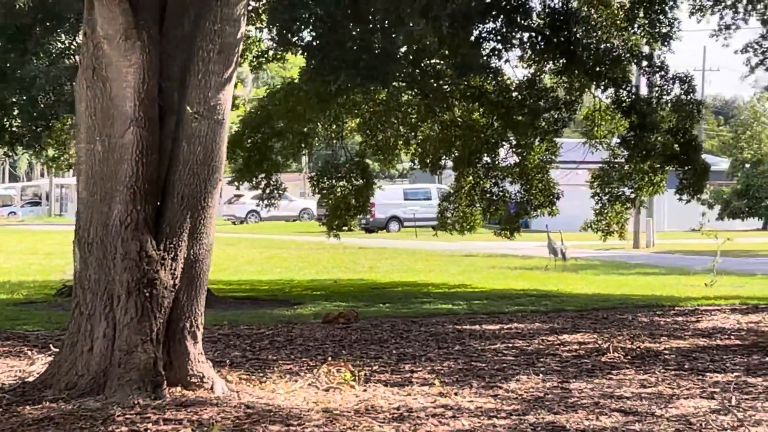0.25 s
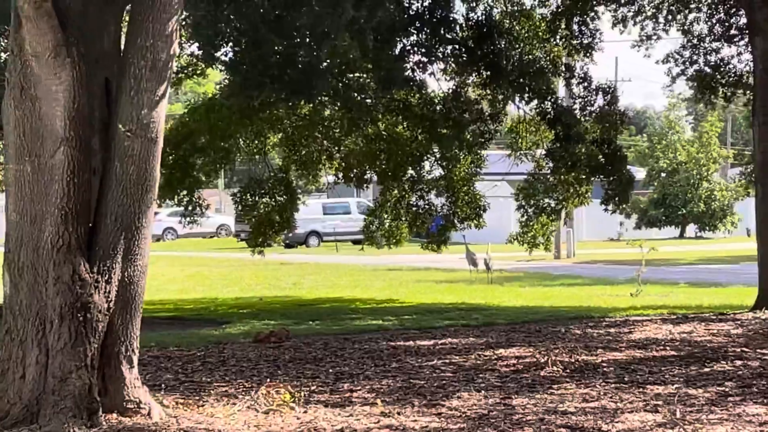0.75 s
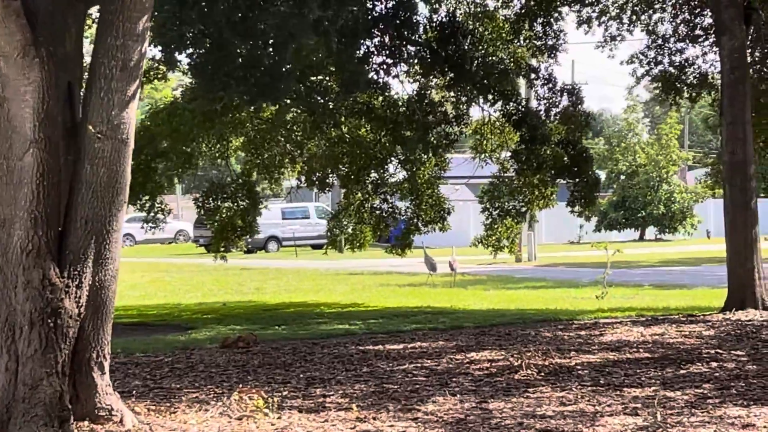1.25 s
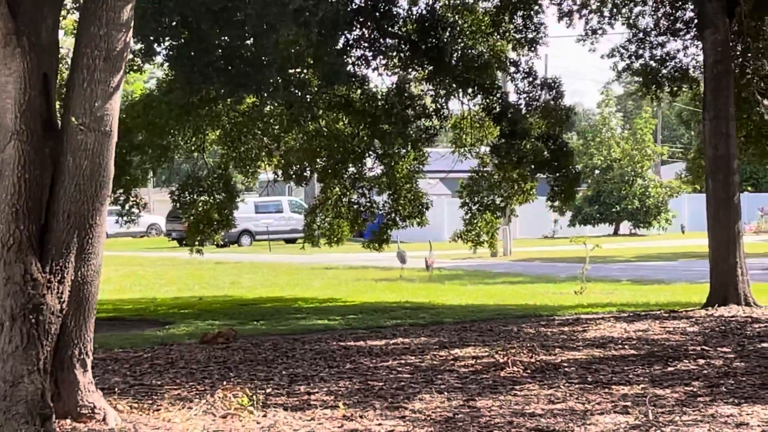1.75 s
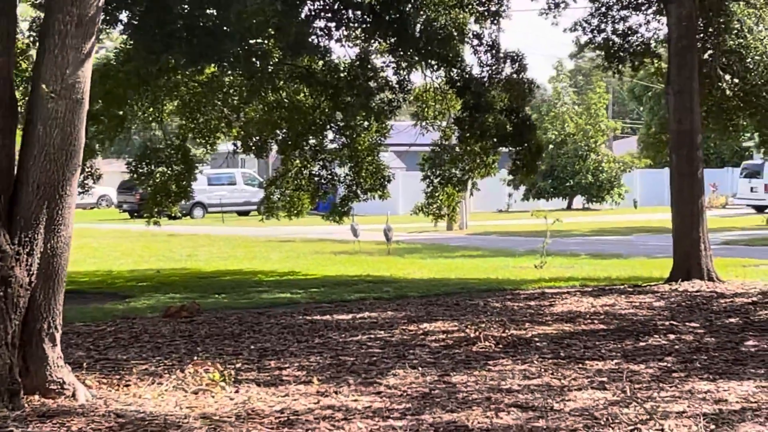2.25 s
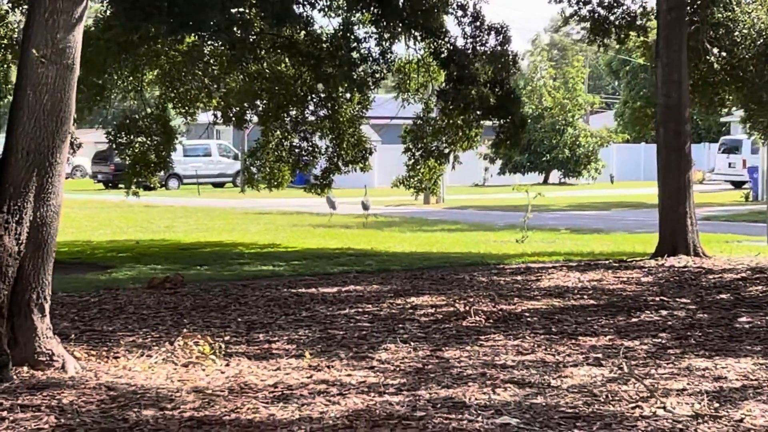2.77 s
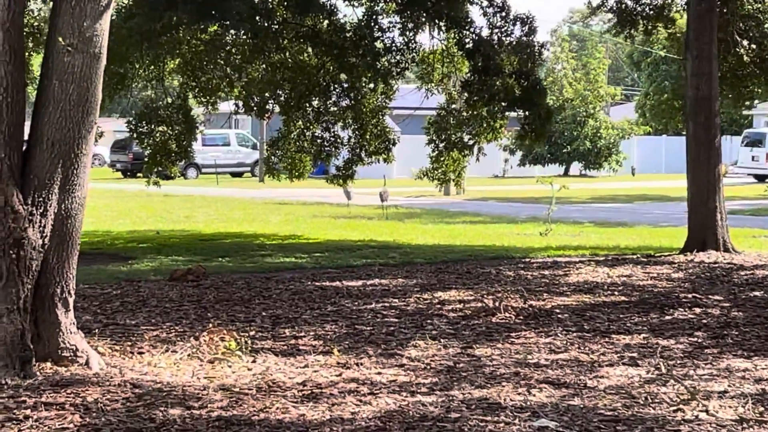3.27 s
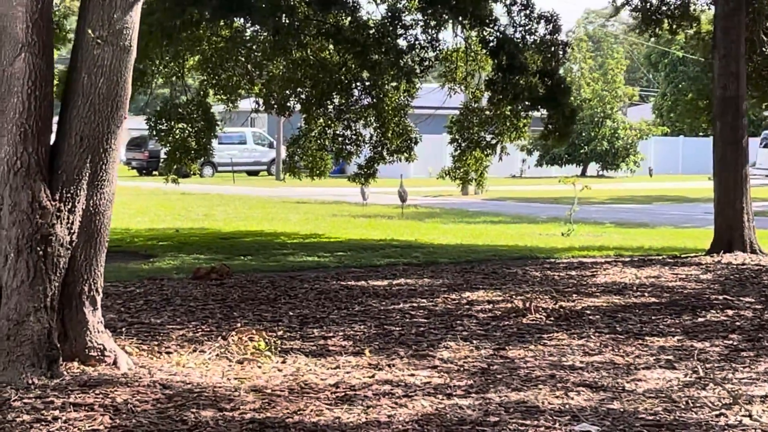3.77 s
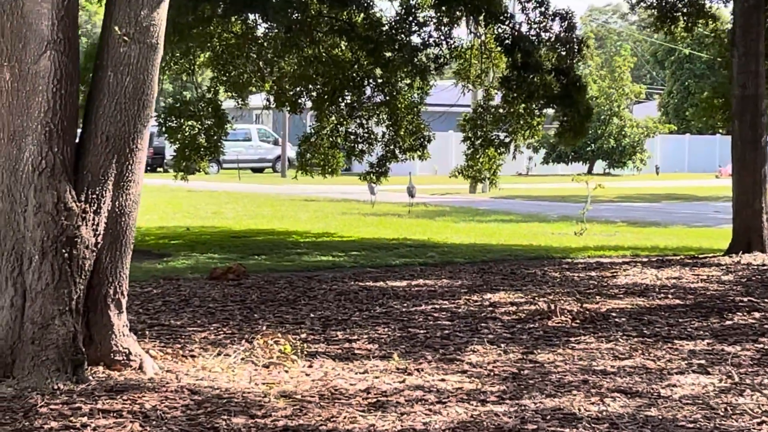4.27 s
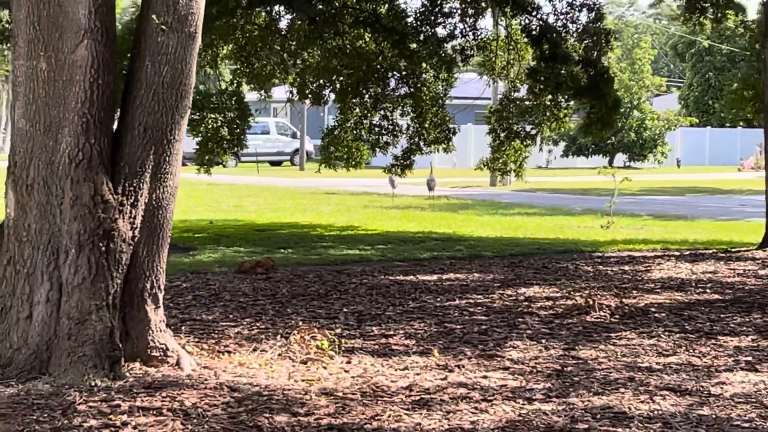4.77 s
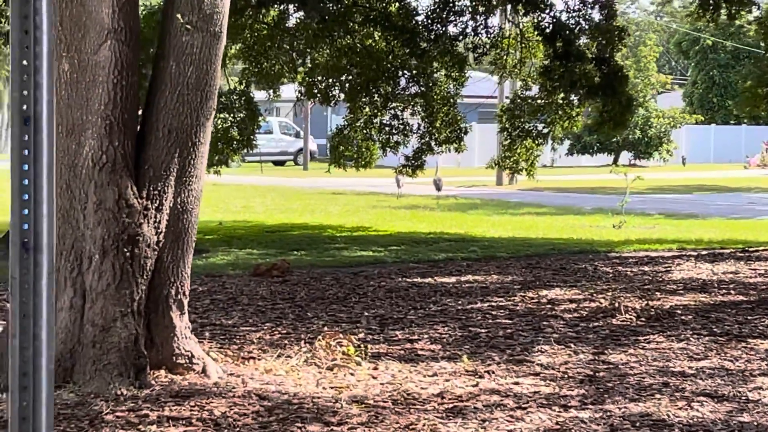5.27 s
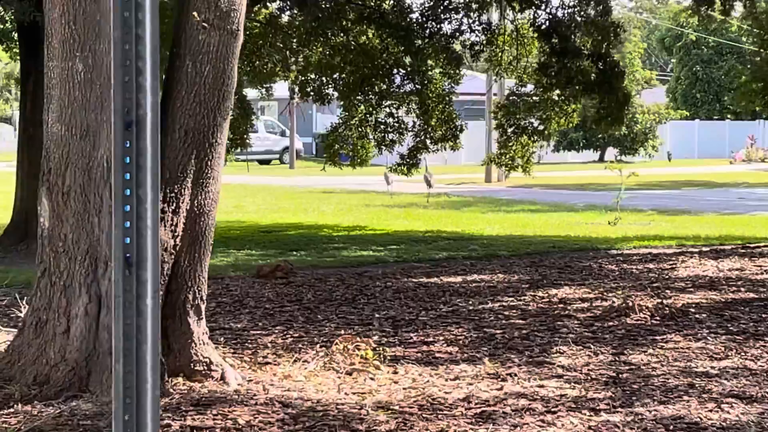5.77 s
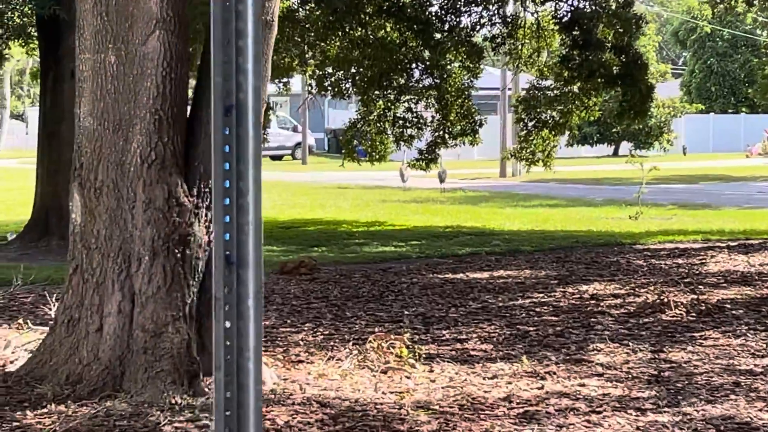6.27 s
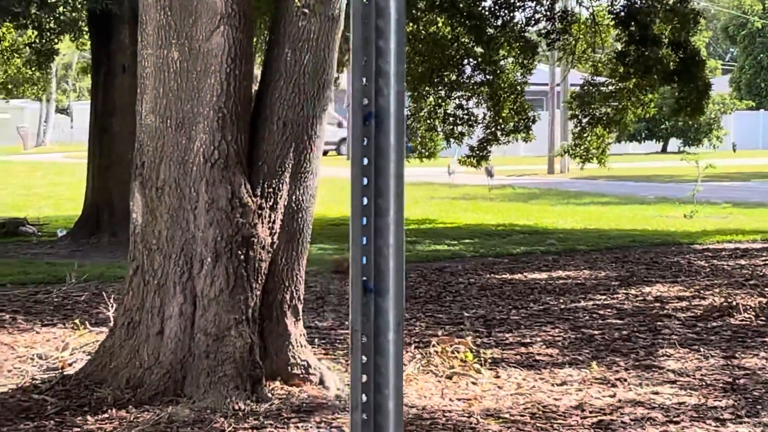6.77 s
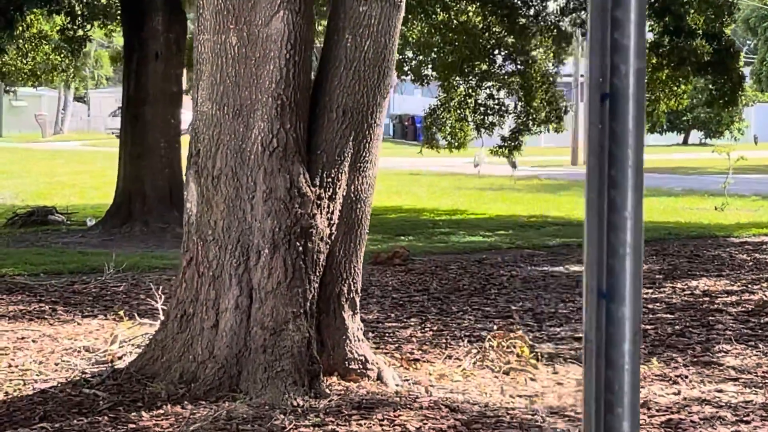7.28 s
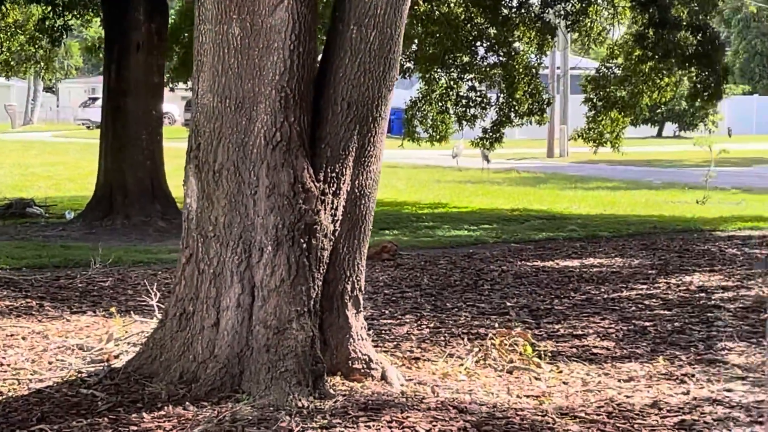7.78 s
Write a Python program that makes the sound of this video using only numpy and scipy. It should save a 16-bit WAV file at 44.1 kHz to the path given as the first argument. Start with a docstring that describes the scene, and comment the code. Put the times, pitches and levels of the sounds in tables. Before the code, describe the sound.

Two large cranes give three short rattling duets outdoors, over a steady low traffic rumble and a few faint crackling footsteps.

```python
"""Two sandhill cranes give three rattling duets on a lawn: one leads with hollow knocks, and its mate
overlaps with harsher beats and finishes alone. Membranes in each bird's voice box pulse and ring its
long, coiled windpipe. A soft note and a short, clear honk mark the start of each duet, and trees and
houses scatter the calls. Behind them traffic rumbles, an engine idles, leaves hiss and something
chirrs faintly; close by, soft steps crackle in the mulch."""
import sys
import numpy as np
from scipy import signal
from scipy.fft import rfft, irfft, next_fast_len
from scipy.io import wavfile

SR = 44100
rng = np.random.default_rng(int(sys.argv[2]) if len(sys.argv) > 2 else 0)


def generate_wav(signal):
    """Clip the signal to [-1, 1] and save it as 16-bit WAV at the path in sys.argv[1]."""
    frames = np.transpose(np.atleast_2d(signal))
    scaled = np.clip(frames, -1, 1) * 32767
    pcm = np.round(scaled).astype(np.int16)
    wavfile.write(sys.argv[1], SR, pcm)


N = 354034
BEAT_TIME = np.arange(SR // 10) / SR   # seconds within one short sound
FFT_SIZE = next_fast_len(N + SR // 10, real=True)
BIN_HZ = np.fft.rfftfreq(FFT_SIZE, 1 / SR)


def from_db(db):
    """Turn decibels into a gain."""
    return 10 ** (np.asarray(db) / 20)


def unit_power(x):
    """Scale a sound to an average power of one."""
    return x / np.sqrt(np.mean(x ** 2) + 1e-20)


def at_hz(points, hz):
    """Read between the rows of a table, on a log-frequency axis."""
    f, value = np.transpose(points)
    return np.interp(np.log(np.maximum(hz, 1)), np.log(f), value)


def add(track, s, sound):
    """Mix a sound in, starting at s seconds."""
    i = round(s * SR)
    track[i:i + len(sound)] += sound[:N - i]


def keep_band(x, hz, kind, order=2):
    """Keep the "low" or the "high" side of hz."""
    return signal.sosfilt(signal.butter(order, hz, kind, fs=SR, output="sos"), x)


def resonate(x, hz, width_hz):
    """Let a sound ring at one frequency; a narrower ring lasts longer."""
    r = np.exp(-np.pi * width_hz / SR)
    feedback = [1, -2 * r * np.cos(2 * np.pi * hz / SR), r * r]
    return signal.lfilter(np.array([1, 0, -1]) * (1 - r * r) / 2, feedback, x)


def cavity(x, modes):
    """A hollow space rings at several frequencies, added with alternating signs."""
    return sum((-1) ** k * from_db(db) * resonate(x, hz, width)
               for k, (hz, width, db) in enumerate(modes))


def drift(rate, size):
    """A random wander that heads for a new value `rate` times a second."""
    at = np.arange(size) * rate / SR + rng.random()
    count = int(at[-1]) + 2
    return np.interp(at, np.arange(count), rng.standard_normal(count))


# How alike sound from all around is in the two ears: f/Hz, likeness from 0 to 1
EAR_LIKENESS = [(40, 1), (130, 0.98), (220, 0.78), (400, 0.47), (750, 0.09), (1300, 0.22), (2200, 1),
                (6000, 1), (12000, 1)]

def stereo_noise(spectrum, size):
    """Noise with a given tone colour, partly alike in both ears."""
    mid, side = rfft(rng.standard_normal((2, FFT_SIZE)))
    alike = at_hz(EAR_LIKENESS, BIN_HZ)
    ears = np.sqrt(1 + alike) * mid + np.sqrt(1 - alike) * side * [[1], [-1]]
    return irfft(from_db(at_hz(spectrum, BIN_HZ)) * ears, FFT_SIZE)[:, :size]


# Tone colour of the traffic: f/Hz, relative level/dB
TRAFFIC_TONE = [(25, -9.5), (38, -5), (53, 5), (66, -2.5), (85, -2), (110, -2), (145, -4), (170, -10),
                (210, -13), (280, -17.5), (380, -19.5), (500, -20)]

def traffic(db=-44.5):
    """Far traffic blends into a steady, low rumble."""
    rumble = keep_band(stereo_noise(TRAFFIC_TONE, N), 430, "low", order=4)
    return from_db(db) * unit_power(rumble)


# Tone colour of the hiss from trees and far roads: f/Hz, relative level/dB
HISS_TONE = [(400, 1), (600, -3), (1000, -7), (1500, -13.5), (2200, -19.5), (3200, -22), (4200, -26.5),
             (4900, -25), (6500, -29), (8200, -32.5), (9800, -26), (10800, -33.5), (12500, -40)]
# Rise and fall of the leaves' hiss, in four groups of rows: t/s, relative level/dB
LEAF_SWELLS = [
    [(0.0, -71), (0.176, -78), (0.42, -71.5)],
    [(2.2, -76), (3.152, -75), (3.5, -77.5)],
    [(4.55, -76.5), (5.092, -77.5), (5.3, -74)],
    [(6.85, -76), (6.964, -75), (8.0, -76)],
]

def breeze(db=-55.5, rustle_db=1.4):
    """Trees and far roads hiss softly; the treble wavers as the leaves rustle."""
    air = from_db(db) * unit_power(keep_band(stereo_noise(HISS_TONE, N), 411, "high", order=4))
    leaves = air - signal.sosfiltfilt(signal.butter(1, 1800, fs=SR, output="sos"), air)
    s, hiss_db = np.vstack(LEAF_SWELLS).T
    lift_db = np.interp(np.arange(N) / SR, s, hiss_db - hiss_db.mean()) + rustle_db * drift(18, N)
    return air + leaves * (from_db(lift_db) - 1)


# The tones of the engine's hum: f/Hz, level/dB
ENGINE_TONES = [(137.5, -56.5), (206, -65), (297, -69)]

def engine(waver=0.0105, flutter=0.32):
    """An engine idles unevenly: its tones waver together in pitch, and each flutters in level."""
    clock = np.cumsum(1 + waver * drift(8, N)) / SR
    return sum(from_db(db) * unit_power(np.sin(2 * np.pi * hz * clock) * (1 + flutter * drift(16, N)))
               for hz, db in ENGINE_TONES)


# Faint, high chirrs far away: t/s, length/s, level/dB
FAR_CHIRRS = [(2.596, 0.3, -71.5), (4.923, 0.3, -81)]

def chirrs(hz=4750, width_hz=650):
    """A thin band of noise, perhaps an insect, swells and fades."""
    out = np.zeros(N)
    for s, length, db in FAR_CHIRRS:
        progress = np.linspace(0, 1, round(length * SR))
        band = resonate(resonate(rng.standard_normal(SR), hz, width_hz), hz, width_hz)[:len(progress)]
        add(out, s, from_db(db) * unit_power(band) * np.sin(np.pi * progress))
    return out


# Feet pressing the mulch: t/s, length/s, level/dB before filtering
FOOTSTEPS = [(1.273, 0.13, -52.5), (1.819, 0.22, -50.5), (1.949, 0.21, -54.5), (2.332, 0.046, -61),
             (4.456, 0.051, -60), (4.647, 0.12, -61.5), (4.748, 0.055, -55), (5.424, 0.089, -49)]

def footsteps(grains_per_s=7000, spread_db=2.5, leaf_hz=6000):
    """Dry leaves crush under each step in tiny clicks, or grains."""
    out = np.zeros(N)
    for s, length, db in FOOTSTEPS:
        size = round(length * SR)
        grains = (rng.random(size) < grains_per_s / SR) * rng.standard_normal(size)
        grains *= from_db(spread_db * rng.exponential(1, size))
        pressure = np.sin(np.pi * np.linspace(0, 1, size) ** 0.44)
        add(out, s, from_db(db) * unit_power(grains) * pressure)
    return keep_band(out, leaf_hz, "high", order=1)


# Twigs and bark breaking: t/s, peak level/dB of the crack, f/Hz
TWIG_SNAPS = [(1.996, -42.5, 3370), (2.074, -43.5, 6400), (3.085, -47, 5000), (3.835, -31.5, 11500),
              (4.7572, -48, 9500), (5.37, -42, 10500), (5.4552, -35.5, 3470), (5.6853, -44, 6960),
              (7.109, -27, 5200), (7.2027, -44, 6060), (7.8848, -47.5, 3500)]

def twigs(wood_db=-5, wood_hz=1150):
    """A twig snaps with a sharp crack; only thick, low-pitched ones add much of a woody note."""
    out = np.zeros(N)
    decay = np.exp(-BEAT_TIME / .0011) + .06 * np.exp(-BEAT_TIME / .016)
    wood = np.sin(2 * np.pi * wood_hz * BEAT_TIME) * np.exp(-BEAT_TIME / .0005)
    for s, db, hz in TWIG_SNAPS:
        crack = resonate(rng.standard_normal(len(decay)) * decay, hz, hz * 0.59)
        thickness_db = wood_db - 40 * np.log10(max(hz / 5000, 1))
        add(out, s, from_db(db) * (crack / np.max(np.abs(crack)) + from_db(thickness_db) * wood))
    return out


# A foot landing heavily: t/s, peak level/dB, f/Hz
HEAVY_STEPS = [(7.114, -34.5, 68)]

def thuds(swell_s=0.0052):
    """The soft ground gives a brief, low bump."""
    out, age = np.zeros(N), BEAT_TIME / swell_s
    for s, db, hz in HEAVY_STEPS:
        add(out, s, from_db(db) * age * np.exp(1 - age) * np.sin(2 * np.pi * hz * BEAT_TIME))
    return out


def house_echo(x, delay_s=0.096, db=-17, dull_hz=2500):
    """A house front behind the birds returns one dull echo."""
    out = np.zeros(N)
    add(out, delay_s, from_db(db) * keep_band(x, dull_hz, "low"))
    return out


# Tone colour of the scattered calls: f/Hz, relative level/dB
SCATTER_TONE = [(400, 16.5), (900, -1.5), (1700, -1.5), (3000, -1), (5000, 13), (8000, 11), (12000, 10)]

def scatter(x, far=(-15, 1.56), near=(-13, 0.95)):
    """Near trunks scatter the sound briefly, far trees and houses for longer."""
    t = np.arange(SR * 3 // 2) / SR
    onset = np.clip((t - .008) / .015, 0, 1)
    response = 0
    for relative_db, fade_s in (far, near):
        decay = from_db(-60 * t / fade_s) * onset
        decay /= np.sqrt(2 * np.sum(decay ** 2))
        response = response + from_db(relative_db) * stereo_noise(SCATTER_TONE, len(t)) * decay
    return signal.fftconvolve(x[None], response, axes=1)[:, :N]


def voiced(pitch, tone, dull_db=0):
    """The throat shapes the harmonics of a pitch; past the second, each loses another dull_db."""
    k = np.arange(1, 14)[:, None]
    phase = 2 * np.pi * (k * np.cumsum(pitch) / SR + rng.random(k.shape))
    gains = from_db(at_hz(tone, k * pitch) - dull_db * np.maximum(k - 2, 0))
    return unit_power(np.sum(gains * np.sin(phase), axis=0))


# Tone colour of a knock: f/Hz, relative level/dB
KNOCK_TONE = [(950, -1), (1400, -27), (1850, -9.5), (2700, -24), (3600, -20), (4600, -28), (6500, -39.5),
              (9000, -35.5), (12000, -40)]

def knock(hz, peak_s=0.004, sag=0.098, rough=0.012):
    """The voice box opens for a few cycles; the pitch sags as the pressure is spent."""
    age = BEAT_TIME / peak_s
    pitch = hz * (1 + sag * np.tanh(1 - age) + rough * drift(1200, len(age)))
    return voiced(pitch, KNOCK_TONE) * age * np.exp((1 - age ** 3) / 3)


def after_knocks(hz, settled_hz, fall_db, gap_s):
    """Three weaker knocks follow, their pitch nearing settled_hz as the membranes settle."""
    out = np.zeros(N)
    for k, (late, loud, detune) in enumerate(rng.standard_normal((3, 3)), start=1):
        pitch = (settled_hz + (hz - settled_hz) * .5 ** k) * (1 + 0.035 * detune)
        add(out, gap_s * (k + .07 * late), from_db(1.3 * loud - k * fall_db) * knock(pitch))
    return out[:len(BEAT_TIME)]


# Where the windpipe and mouth ring in a rasp: f/Hz, width/Hz, relative level/dB
THROAT_RINGS = [(775, 124, -4), (920, 94, -2.5), (1248, 210, -2.5), (1680, 190, -2.5), (1898, 63, 0),
                (2160, 120, -14)]
# Higher rings that make the rasp bright: f/Hz, width/Hz, relative level/dB
BRIGHT_RINGS = [(2350, 240, -3), (2930, 320, -3.5), (3320, 244, -5.5), (3710, 270, -10), (4320, 750, -15.5),
                (6600, 2050, -22), (8200, 6900, -27.5)]

def rasp(length, beak_hz, bright_db, fade_db=4, slap_hz=430, jitter=.3, uneven_db=3, breath=0.016):
    """The membranes slap irregularly and ring the long windpipe and the beak."""
    t, size = BEAT_TIME, len(BEAT_TIME)
    progress = t / length
    cycles = np.floor(np.cumsum(slap_hz * np.exp(jitter * drift(600, size))) / SR)
    slaps = np.diff(cycles, prepend=-1) * from_db(uneven_db * rng.standard_normal(size))
    source = (slaps + breath * rng.standard_normal(size)) * (t < length) * from_db(-fade_db * progress)
    opening = from_db(2 + 8 * (np.minimum(progress, 1) - .5))   # the beak rings more as the beat goes on
    beak = resonate(source * opening, beak_hz, width_hz=130)
    body = keep_band(cavity(source, THROAT_RINGS) + beak, 604, "high", order=4)
    edge = keep_band(cavity(source * from_db(-5 * progress), BRIGHT_RINGS), 1600, "high")
    beat = unit_power(keep_band(body, 2500, "low")) + from_db(bright_db) * unit_power(edge)
    # all the rings slide down a little as the throat relaxes
    slowing = np.cumsum(1 + 0.021 * np.tanh(1 - 2 * progress)) / SR
    return np.interp(slowing, t, beat) * np.sqrt(length / t[-1])


def rattle(first_s, last_s, count, linger):
    """Quickening beats, as (t/s, share of the call spent); linger stretches the first gaps."""
    k = np.arange(round(count))
    relative_gaps = 0.06 + linger * 0.22 ** k - 0.0012 * k
    elapsed = np.cumsum(relative_gaps) - relative_gaps
    spent = elapsed / elapsed[-1]
    return zip(first_s + (last_s - first_s) * spent, spent)


# The mate's rattles: first beat t/s, last beat t/s, knock relative level/dB, knock fade/dB, share of
# the call before that fade, knock f/Hz, pitch drop/Hz, rasp relative level/dB, brightness/dB
MATE_CALLS = [(0.796, 1.2043, -24.5, 15, 0.45, 838, 142, -35, -9.5),
              (3.755, 4.1615, -22, 27, 0.4, 863, 92, -34, -7),
              (6.0154, 6.4257, -28, 20.5, 0.25, 896, 90, -33.5, -6)]

def mate(rasp_fade_db=2, beak_turn=0.68, turn_width=0.055):
    """A lower knock opens each beat and breaks into a rasp; as effort fades, mostly rasp is left."""
    out = np.zeros(N)
    beak_step = [beak_turn - turn_width, beak_turn + turn_width]   # shares of the call
    for first_s, last_s, knock_db, fade_db, hold, start_hz, drop_hz, rasp_db, bright_db in MATE_CALLS:
        for s, spent in rattle(first_s, last_s, count=8, linger=0.0138):
            tired = spent ** 2
            hz = start_hz - drop_hz * tired
            knocks = knock(hz) + after_knocks(hz, settled_hz=763, fall_db=4.5, gap_s=.0078)
            add(out, s, from_db(knock_db - np.interp(spent, [hold, 1], [0, fade_db])) * knocks)
            rasp_s = np.interp(tired, [0, 1], [0.025, 0.013])
            beak_hz = np.interp(spent, beak_step, [1490, 1780])
            add(out, s, from_db(rasp_db - rasp_fade_db * tired) * rasp(rasp_s, beak_hz, bright_db))
    return out


# The leading crane's calls: first beat t/s, last beat t/s, number of beats, knock relative level/dB,
# knock f/Hz, honk level/dB, soft note level/dB
LEADER_CALLS = [(0.618, 0.965, 7, -26.5, 935, -32.5, -47.5), (3.584, 4.0477, 9, -25.5, 930, -32.5, -57),
                (5.839, 6.247, 8, -25, 934, -32.5, -43.5)]

def leader(fade_db=6, drop_hz=44.7, rasp_db=-16.5):
    """Hollow knocks, each with a light rasp; they weaken and sink as the bird tires late in the call."""
    out = np.zeros(N)
    for first_s, last_s, count, db, start_hz, *_ in LEADER_CALLS:
        for s, spent in rattle(first_s, last_s, count, linger=0.0083):
            tired = spent ** 4.8
            hz = start_hz - drop_hz * tired
            beat = knock(hz) + after_knocks(hz, settled_hz=926, fall_db=7, gap_s=.0072)
            beat += from_db(rasp_db) * rasp(0.024, beak_hz=1430, bright_db=-4.5, fade_db=4.5)
            add(out, s, from_db(db - fade_db * tired) * beat)
    return out


# Tone colour of a honk: f/Hz, relative level/dB
HONK_TONE = [(560, -13.5), (1100, 3), (1400, -7), (1730, 1.5), (2300, -13), (2900, -6.5), (3480, -9.5),
             (4100, -20), (5200, -30), (7000, -31)]

def honk(length, db, start_hz, top_hz, hoarse, swell_db=10, flutter_db=2.4, full_db=-32.5, release=0.13):
    """A note slides up and swells, then stops; the further below full_db, the duller it is."""
    size = round(length * SR)
    progress = np.linspace(0, 1, size)
    pitch = start_hz + (top_hz - start_hz) * np.sin(2.05 * progress) ** 2
    pitch *= 1 + 0.0013 * drift(420, size)
    effort_db = db - swell_db * (1 - progress) ** 2 - flutter_db * drift(334, size)
    tone = voiced(pitch, HONK_TONE, dull_db=4 * np.tanh(np.maximum(full_db - effort_db, 0) / 6))
    tone *= 1 + hoarse * drift(900, size)   # uneven cycles fill the gaps between harmonics
    return from_db(effort_db) * np.interp(progress, [0, .08, 1 - release, 1], [0, 1, 1, 0]) * tone


def opening_notes(lead_s=0.137, lag_s=0.045):
    """A soft, hoarse note announces each duet; a full honk follows the first knock."""
    out = np.zeros(N)
    for s, *_, honk_db, soft_db in LEADER_CALLS:
        add(out, s - lead_s, honk(0.0434, soft_db, start_hz=525, top_hz=580, hoarse=0.52))
        add(out, s + lag_s, honk(0.069, honk_db, start_hz=509.7, top_hz=574.3, hoarse=0.088))
    return out


# Narrow rings of the windpipe: f/Hz, width/Hz, relative level/dB
WINDPIPE_RINGS = [(752, 20, -7), (941, 11, 4), (1511, 56, -6), (1664, 66, -6.5), (2954, 22, -7)]

def windpipe(x):
    """The long, coiled windpipe rings on after each beat."""
    return x + sum(from_db(db) * resonate(x, hz, width) for hz, width, db in WINDPIPE_RINGS)


# How much louder the cranes are on the left than on the right: f/Hz, level/dB
EAR_BALANCE = [(550, 1), (800, -3), (970, -5.5), (1200, 1.5), (1570, -3), (1750, 4), (2000, 0),
               (2220, -2.2), (2700, 0)]

def to_ears(x):
    """The ground and trunks favour one ear or the other, depending on the frequency."""
    gains = from_db(at_hz(EAR_BALANCE, BIN_HZ) * [[.5], [-.5]])
    return irfft(rfft(x, FFT_SIZE) * gains, FFT_SIZE)[:, :N]


def scene(rattle_db=-1.48):
    """The cranes call from ahead, over their echoes, the steps and the background."""
    cranes = windpipe(from_db(rattle_db) * (leader() + mate())) + opening_notes()
    calls = to_ears(cranes) + scatter(cranes) + house_echo(cranes)
    return calls + footsteps() + twigs() + thuds() + traffic() + breeze() + engine() + chirrs()


# How far the left microphone opening runs ahead of the right: f/Hz, phase/radians
LEFT_LEAD = [(60, -0.05), (340, 0.39), (860, 0.15), (1700, 0.09), (3000, 0.61), (5500, 0.8), (6600, 0.95),
             (8000, 0), (9000, -0.7), (9700, 4.5), (10400, 3), (10900, 4), (11500, 2 * np.pi)]

def record(dry, bass_hz=36, top_hz=12600):
    """Two microphone openings slip out of step in the treble; the deepest bass and the top are cut."""
    turn = np.exp(-1j * at_hz(LEFT_LEAD, BIN_HZ) * [[0], [1]])
    shifted = irfft(rfft(dry, FFT_SIZE) * turn, FFT_SIZE)[:, :N]
    trimmed = keep_band(shifted, bass_hz, "high", order=10)
    return signal.sosfilt(signal.ellip(10, .1, 80, top_hz, fs=SR, output="sos"), trimmed)


dry = scene()
out = record(dry)
generate_wav(out)
```